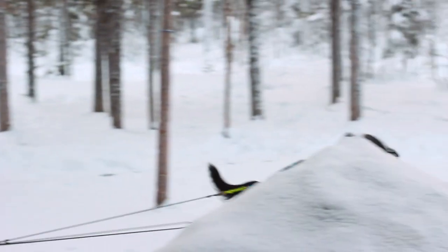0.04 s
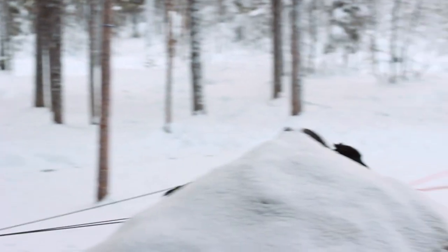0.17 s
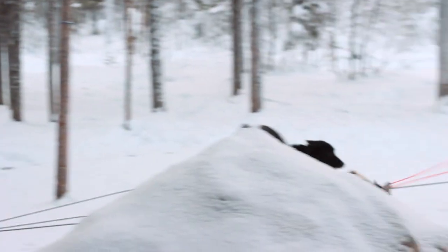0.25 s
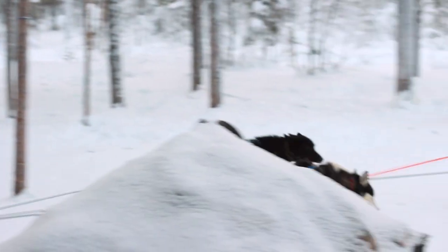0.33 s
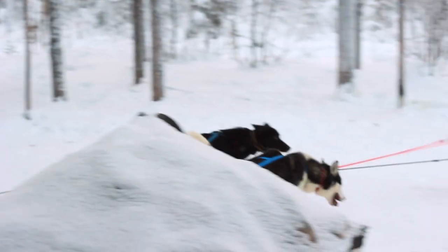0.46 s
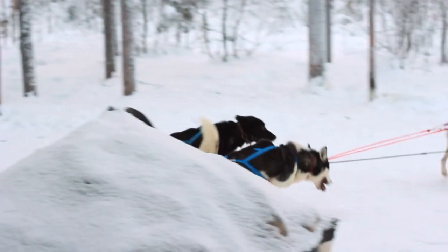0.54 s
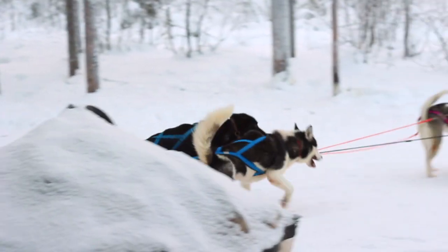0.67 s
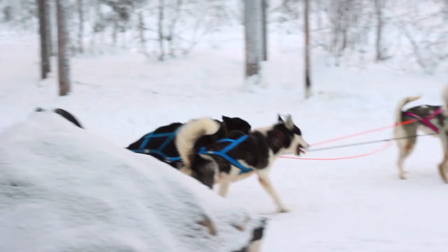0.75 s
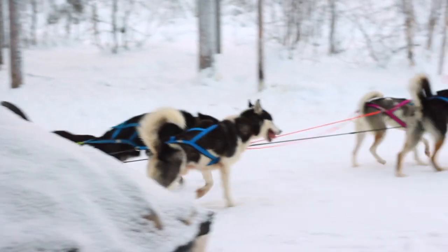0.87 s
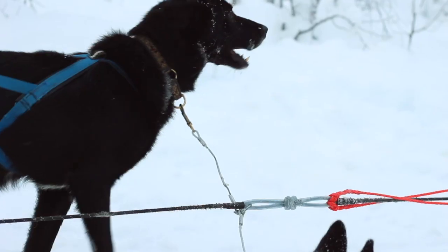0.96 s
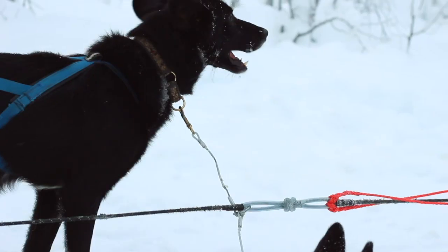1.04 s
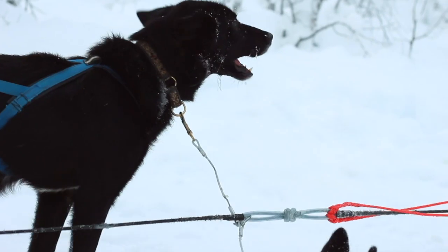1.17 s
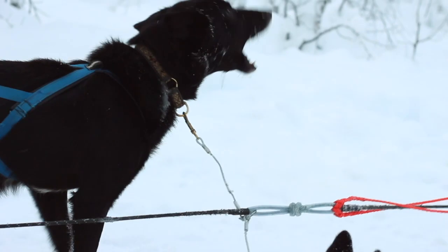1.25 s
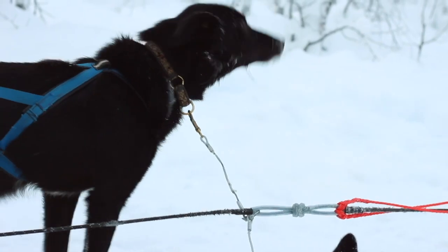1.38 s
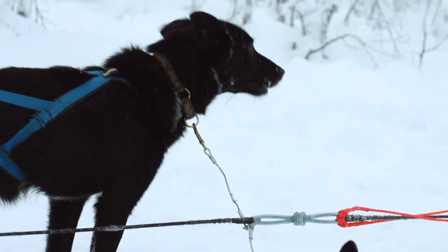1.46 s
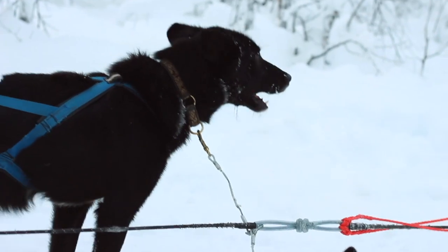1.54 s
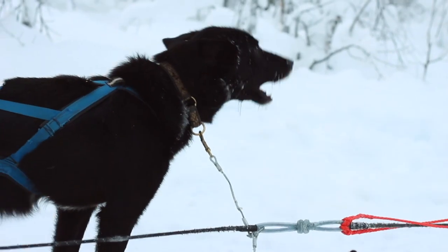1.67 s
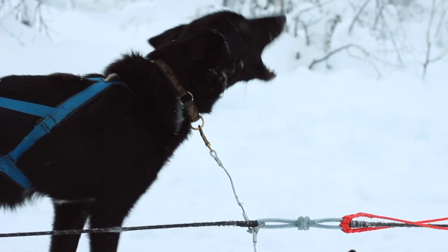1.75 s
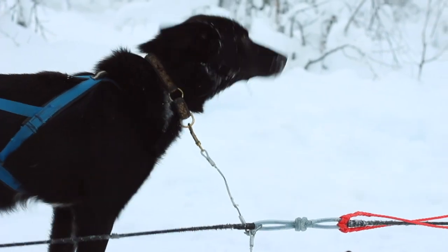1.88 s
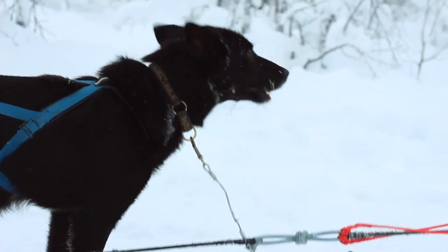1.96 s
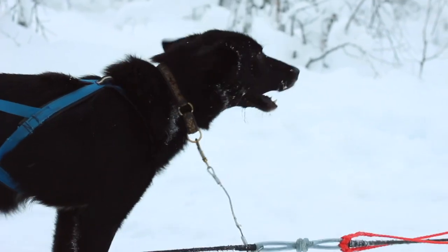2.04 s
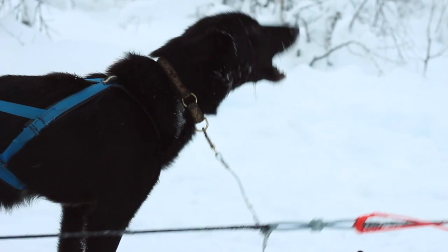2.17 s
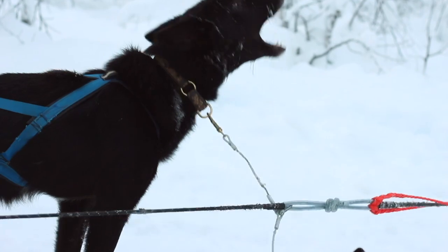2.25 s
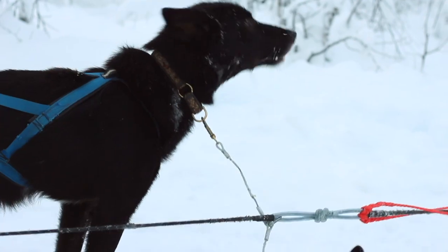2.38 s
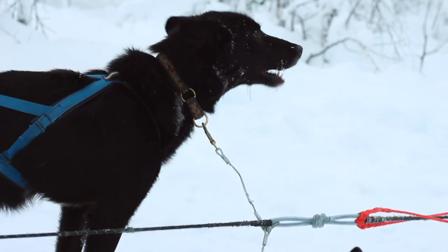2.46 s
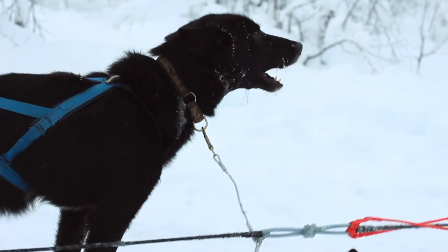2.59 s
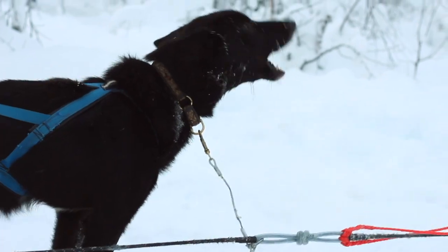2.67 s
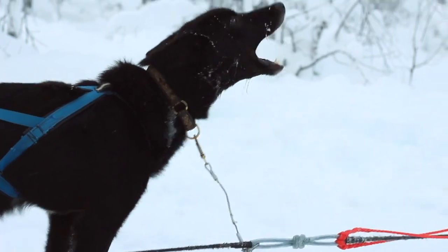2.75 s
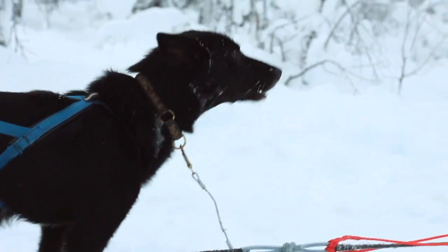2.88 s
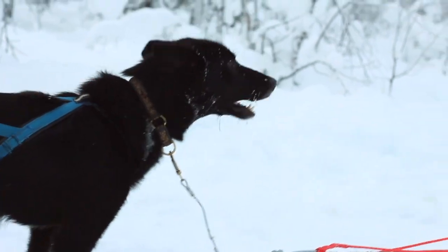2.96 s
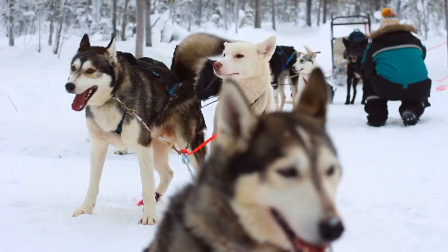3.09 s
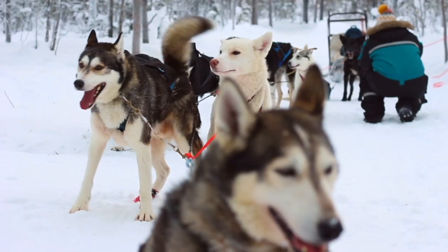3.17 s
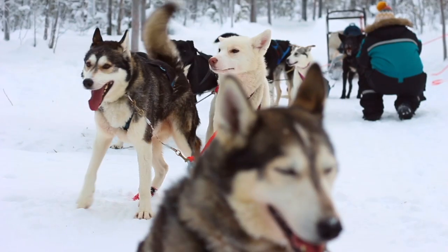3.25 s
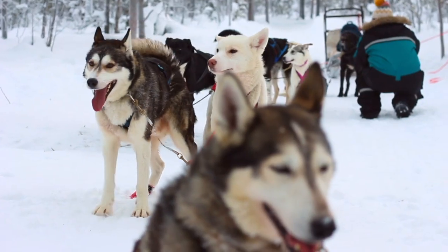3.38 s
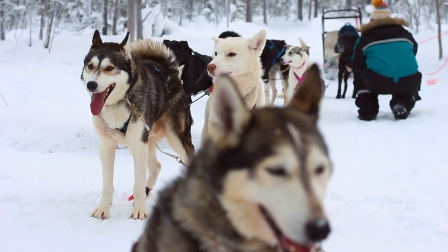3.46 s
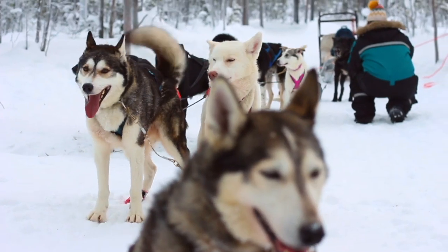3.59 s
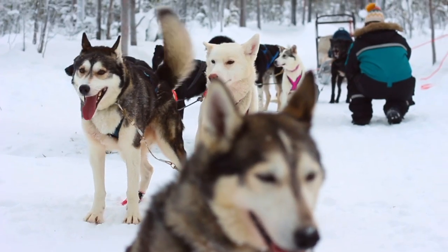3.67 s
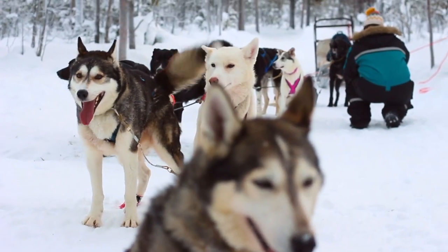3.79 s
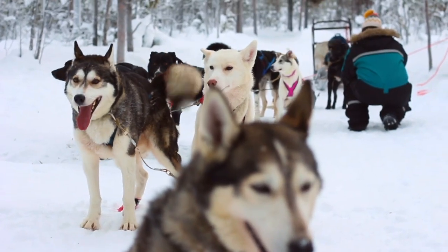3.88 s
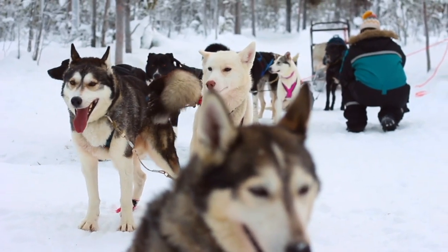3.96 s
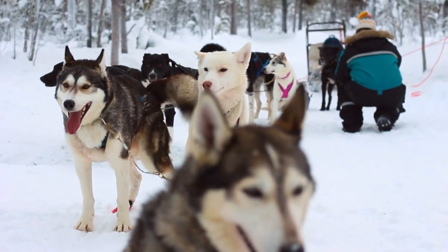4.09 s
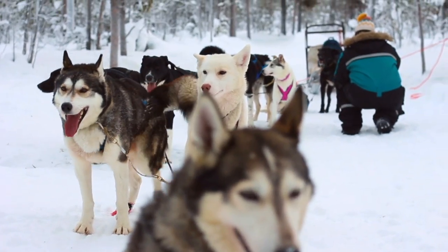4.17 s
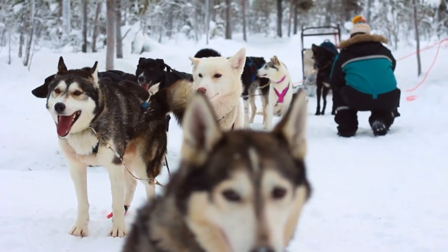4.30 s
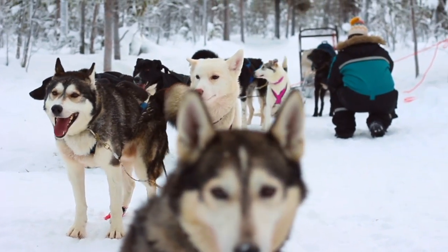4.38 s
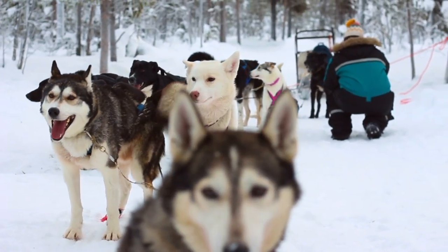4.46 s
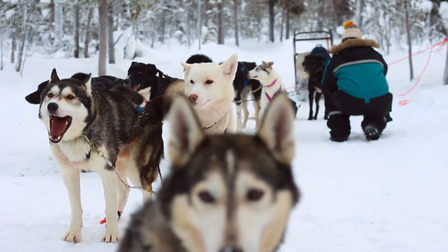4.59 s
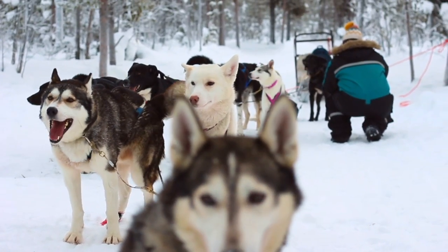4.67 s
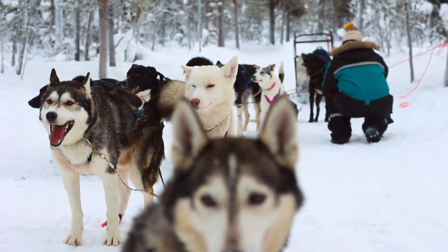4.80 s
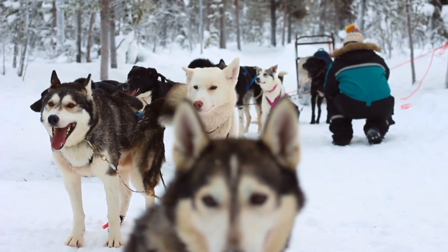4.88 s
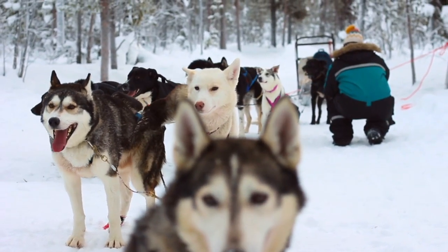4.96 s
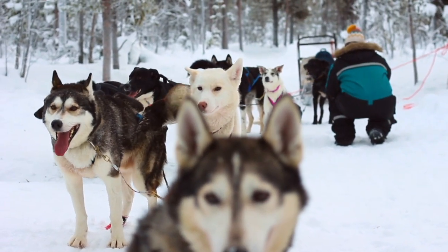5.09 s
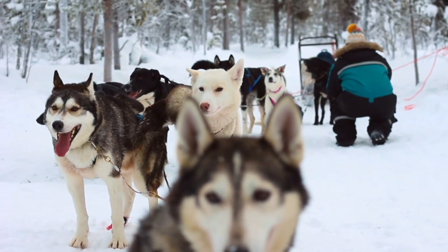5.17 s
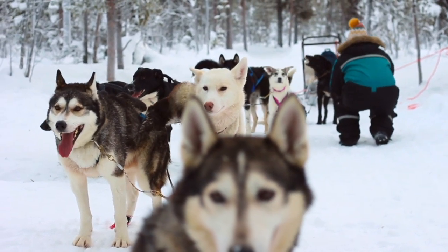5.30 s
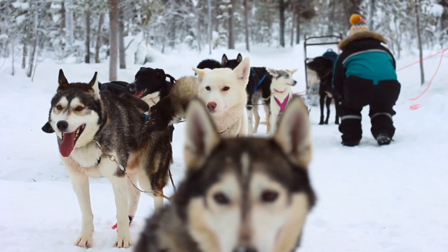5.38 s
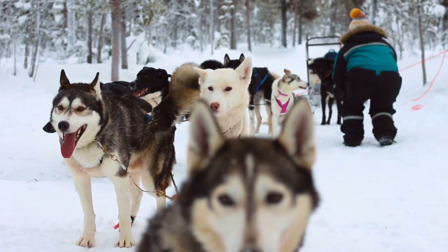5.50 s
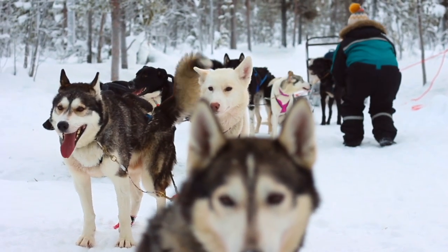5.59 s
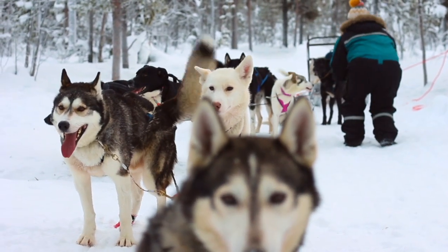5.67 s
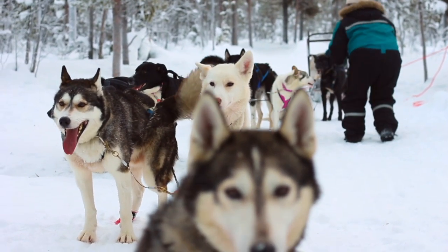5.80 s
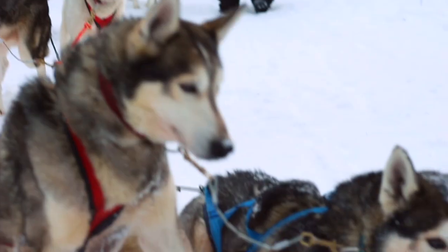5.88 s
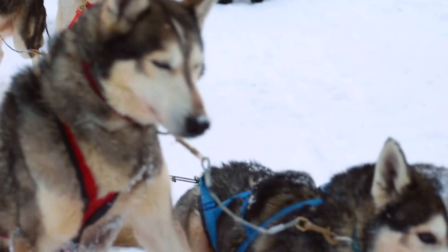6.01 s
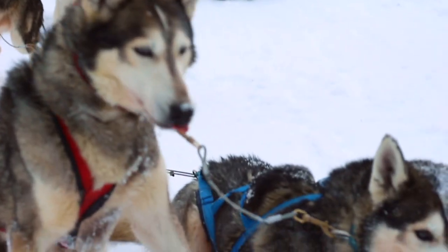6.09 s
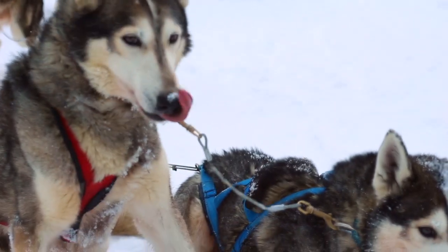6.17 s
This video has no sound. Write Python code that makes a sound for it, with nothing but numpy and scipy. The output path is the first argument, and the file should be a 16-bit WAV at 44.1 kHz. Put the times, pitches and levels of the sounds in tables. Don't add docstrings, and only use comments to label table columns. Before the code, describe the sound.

Sharp, short dog barks in four abruptly cut perspectives: quiet distant barks and cries with forest echo, then four dry, forceful barks close enough to overload the microphone, then five moderate hoarse barks spaced evenly a few metres away, slightly left, with panting, far yelps and thin nasal squeaks between them. One clear bark ends it. The open snowy forest returns a dull, short echo.

```python
import sys
import numpy as np
from scipy import signal
from scipy.fft import rfft, irfft
from scipy.io import wavfile
from scipy.ndimage import uniform_filter1d

SR = 44100
rng = np.random.default_rng(int(sys.argv[2]) if len(sys.argv) > 2 else 0)


def master_out(mix):
    frames = np.transpose(np.atleast_2d(mix))
    ceiling = np.clip(frames, -1, 1)
    pcm = np.round(ceiling * 32767).astype(np.int16)
    wavfile.write(sys.argv[1], SR, pcm)


def volts(x):
    e = np.asarray(x, float) / 20
    return 10 ** e


N = 275184

# (start [s], creak length [s], voiced length [s], first partial level [dB], pitch [Hz])
FAR = [
    (0, 0.021, 0.086, -40, 603),
    (.108, .025, .11, -35, 642.3),
    (.6, 0.029, 0.094, -36, 748),
    (.915, 0.019, 0.045, -34.5, 582.6),
    (.975, 0.02, 0.052, -42, 726),
]
NEAR = [
    (1.2826, .048, 0.092, -6.5, 602.3),
    (1.7677, 0.056, .078, -7, 590.6),
    (2.2075, .066, .095, -8, 612.8),
    (2.686, 0.075, .1, -6.5, 610),
]
TEAM = [
    (3.345, .04, .1, -22.5, 585.7),
    (3.861, 0.027, 0.1, -23.5, 578.4),
    (4.335, 0.0089, 0.11, -23, 587.2),
    (4.79, 0.027, 0.1, -23.5, 569.5),
    (5.258, .04, .097, -24, 581.3),
]
GROWL = [(4.2366, 0.1, 0.0033, -39, 603)]
YIP = [(4.597, .045, .04, -29.5, 507.8)]
LAST = [(6.057, 0.084, .057, -21.5, 591)]
CRIES = [
    (.02, 0.0056, 0.028, -54.5, 630),
    (.055, 0.0067, 0.064, -53, 540),
    (.125, 0.017, 0.017, -50, 665),
    (.155, .012, 0.043, -46, 515),
    (.612, 0.016, 0.09, -56, 650),
    (.65, 0.0065, 0.052, -51, 545),
    (.995, 0.0069, 0.049, -59, 580),
]

FAR_VOICE = dict(creak_hz=140, rough=.5, mouth=1.02, pan_db=-1)
NEAR_VOICE = dict(creak_hz=118, rough=.18, mouth=1.0, pan_db=-.6)
TEAM_VOICE = dict(creak_hz=115, rough=.42, mouth=1.0, pan_db=-3.8)
GROWL_VOICE = dict(creak_hz=90, rough=.9, mouth=.97, pan_db=-2.8)
YIP_VOICE = dict(creak_hz=110, rough=.03, mouth=1.0, pan_db=-3.3)
LAST_VOICE = dict(creak_hz=120, rough=.03, mouth=1.0, pan_db=-4)
CRY_VOICE = dict(creak_hz=140, rough=.12, mouth=1.02, pan_db=-1)

FAR_EFFORT = dict(start_db=-6.5, attack_s=0.024, creak_db=-1.5, swell_s=.04, sag_db=-3, release_s=0.064, scoop=.03, droop=0.06)
NEAR_EFFORT = dict(start_db=-22, attack_s=.016, creak_db=-6.5, swell_s=.028, sag_db=-0.63, release_s=0.033, scoop=.07, droop=.08)
TEAM_EFFORT = dict(start_db=-13.5, attack_s=0.038, creak_db=-3, swell_s=.045, sag_db=-2.5, release_s=0.023, scoop=0.05, droop=.06)
GROWL_EFFORT = dict(start_db=-36, attack_s=0.016, creak_db=-1, swell_s=0.0097, sag_db=-6, release_s=.015, scoop=0.01, droop=.03)
YIP_EFFORT = dict(start_db=-20, attack_s=.02, creak_db=-10, swell_s=.021, sag_db=-5, release_s=.035, scoop=.07, droop=.055)
LAST_EFFORT = dict(start_db=-28, attack_s=0.076, creak_db=-5.5, swell_s=.032, sag_db=-3, release_s=0.019, scoop=0.028, droop=0.034)
CRY_EFFORT = dict(start_db=-18, attack_s=0.0073, creak_db=-4.5, swell_s=0.018, sag_db=-1.5, release_s=.022, scoop=0.022, droop=.05)

FAR_MIX = dict(upper_db=-10.5, rasp_db=5, rasp_slope=0.91, break_db=-3.5, breath_db=-21.5, breath_slope=1)
NEAR_MIX = dict(upper_db=-17, rasp_db=-9, rasp_slope=0.86, break_db=6.5, breath_db=-7.5, breath_slope=2.32)
TEAM_MIX = dict(upper_db=-6, rasp_db=1.5, rasp_slope=0.99, break_db=0, breath_db=-20, breath_slope=1)
GROWL_MIX = dict(upper_db=-5.5, rasp_db=18.5, rasp_slope=1.05, break_db=0.5, breath_db=-14, breath_slope=0.57)
YIP_MIX = dict(upper_db=22, rasp_db=8, rasp_slope=0.48, break_db=-9, breath_db=12, breath_slope=1.4)
LAST_MIX = dict(upper_db=-0.5, rasp_db=-19.5, rasp_slope=0.085, break_db=11.5, breath_db=-51, breath_slope=0.1)
CRY_MIX = dict(upper_db=15.5, rasp_db=4.5, rasp_slope=1, break_db=-3.5, breath_db=-10, breath_slope=0.99)

# (center [Hz], width [Hz], level [dB])
FAR_THROAT = [(330, 240, -13.5), (928, 230, 5.5), (1350, 670, 1.5), (2300, 290, 1), (2900, 1700, -4.5)]
NEAR_THROAT = [(441.5, 200, 1.5), (809, 500, 9.5), (1630, 340, -6), (1930, 174, 0), (2660, 690, -22)]
TEAM_THROAT = [(415, 240, -19.5), (950, 510, 4.5), (1517, 202, 2.5), (1876, 200, -0.5), (2220, 290, -6)]

HOARSE_DB = [0.5, 0, -15.5, -35.5]
NEAR_DB = [0.5, 5.5, -7.5, -8.5]
YIP_DB = [0, -17, -22, -20]
LAST_DB = [-1, -2.5, -16, -30]
CRY_DB = [2.2, -14.5, -12, -19.5]

# (frequency [Hz], level per hertz [dB])
NEAR_BREATH = [(1290, -28.5), (2200, 6.5), (2590, -4.5), (2980, -3.5), (3450, -4.5), (4030, -7.5),
               (15600, -39)]
TEAM_BREATH = [(1800, -30), (2800, 3), (3500, -14), (4350, -2), (4850, -17), (5500, -1), (6400, -14),
               (15600, -38)]

# (start [s], length [s], pitch [Hz], glide [Hz], level [dB])
WHISTLES = [
    (0.77, 0.016, 9770, -1300, -38.5),
    (1.333, .052, 700, 165, -10),
    (2.044, 0.15, 3860, 28.5, -70),
    (2.441, 0.051, 4250, -400, -66),
    (2.875, .09, 6240, 58, -60.5),
    (3.031, 0.071, 5100, 81, -57.5),
    (4.326, 0.028, 6660, 84.5, -45.5),
    (4.689, 0.039, 6080, 198.5, -31.5),
    (4.719, 0.0693, 1042, 293.5, -38),
    (5.943, 0.078, 4430, -260, -53),
]

# (middle [s], length [s], far yelps and late bark echo level [dB],
# panting level [dB])
PACK = [(0.27, 0.1, -80, -57), (.85, 0.48, -57.5, -67), (1.083, 0.15, -66.5, -61.5),
        (1.202, .14, -64.5, -67.5), (1.6, 0.35, -56.5, -102.5), (2.076, 0.25, -52.5, -71),
        (2.55, 0.2, -69, -112), (3.101, 0.051, -60, -54.5), (3.229, 0.39, -113.5, -58.5),
        (3.259, 0.36, -56.5, -57.5), (3.62, 0.21, -57, -75.5), (3.775, 0.078, -55.5, -65),
        (4.075, 0.13, -62, -84), (4.501, 0.18, -49.5, -62), (4.705, 0.21, -51, -41),
        (5.164, 0.065, -83.5, -70), (5.592, 0.062, -81.5, -56.5), (5.778, 0.053, -85, -81.5),
        (5.862, 0.069, -68.5, -49), (5.877, 0.0083, -47.5, -51), (5.946, 0.061, -54.5, -54)]
# (center [Hz], width [Hz], level [dB])
YELP = [(580, 120, 2.65), (1090, 130, -1.5), (1650, 630, -4.5)]
PANT = [(1400, 1200, -1.5), (2170, 180, 0), (2950, 240, -3.5), (3450, 340, -4), (4130, 630, -7.5),
        (5500, 1500, -17.5)]
PAWS = [(238.6, 59, -2), (350, 51, 1.5)]
# (far yelps and late bark echo [dB], panting [dB], paws [dB])
HUSH = [
    (-56, -53, -64.5),
    (-62, -85.5, -81.5),
    (-69, -73, -79),
    (-57.5, -64, -78),
]

# (start [s], peak level [dB], pitch [Hz])
TICKS = [
    (.262, -36, 4200),
    (.392, -44.5, 3870),
    (.423, -41.5, 1120),
    (1.1, -40.5, 788),
    (1.116, -43.5, 766),
    (1.673, -56, 3030),
    (2.2, -55, 3100),
    (3.195, -56.5, 7000),
]

# (start [s], end [s], fade-out [s], right channel delay [samples])
SHOTS = [
    (0, .9545, 1e-5, 2),
    (.958, 3.046, .01, 1),
    (3.048, 5.877, .002, 0),
    (5.91, 6.24, 1e-5, 0),
]
ECHO_GAIN_DB = [-12, -24, -18, -22.5]

RELEASE_DB, CREAK_RISE_DB, UPPER_SLOPE = -36.5, 4.5, 1.2
BREAK_S, EXHALE_S, EXHALE_DB = 0.01305, 0.015, -10
THROAT_TOP_HZ, EARLY_TONE, PATCH_DB = 2800, .35, 4
WAVER_HZ, WAVER, TAPER_DB = 13, .018, -17
PAWS_DB, STIR_EDGE_DB, TICK_CYCLES = -32.5, -18, 15
ECHO_T60_S, ECHO_TOP_HZ, SNOW_T60_S, SNOW_DB, YIP_ECHO_DB = 0.63, 2200, 0.31, 15, -9
OVERLOAD = .86
POP_S, POP_WIDTH_S, POP_DB = .953, 0.00075, -38


def barks():
    close_air, distant_air = breath_noise(NEAR_BREATH), breath_noise(TEAM_BREATH)
    out, hiss = np.zeros((3, N)), rng.standard_normal(N)
    sway = wobble(100), wobble(59)
    dogs = [
        (CRIES, CRY_VOICE, CRY_EFFORT, CRY_MIX, FAR_THROAT, CRY_DB),
        (FAR, FAR_VOICE, FAR_EFFORT, FAR_MIX, FAR_THROAT, HOARSE_DB),
        (NEAR, NEAR_VOICE, NEAR_EFFORT, NEAR_MIX, NEAR_THROAT, NEAR_DB),
        (TEAM, TEAM_VOICE, TEAM_EFFORT, TEAM_MIX, TEAM_THROAT, HOARSE_DB),
        (GROWL, GROWL_VOICE, GROWL_EFFORT, GROWL_MIX, TEAM_THROAT, HOARSE_DB),
        (YIP, YIP_VOICE, YIP_EFFORT, YIP_MIX, TEAM_THROAT, YIP_DB),
        (LAST, LAST_VOICE, LAST_EFFORT, LAST_MIX, TEAM_THROAT, LAST_DB),
    ]
    for calls, *dog in dogs:
        air = close_air if calls is NEAR else distant_air
        for row in calls:
            span, sound = bark(row, *dog, air, hiss, sway)
            if calls is FAR:
                sound = lowpass(sound, 2, 6500)
            to_trees = sound.mean(0)
            if calls is YIP:
                to_trees = to_trees * volts(YIP_ECHO_DB)
            shot_end = min(end for _, end, *_ in SHOTS if end > row[0])
            out[:, span] += np.vstack([sound, to_trees]) * (span / SR < shot_end)
    return out


def bark(row, voice, shape, mix, throat, partial_db, air, hiss, sway):
    start, creak_s, voiced_s, level_db, pitch_hz = row
    rough = voice["rough"]
    end_s = creak_s + voiced_s
    span = np.arange(int(start * SR), min(int((start + end_s + .1) * SR), N))
    t = span / SR - start
    push_db, bend = effort(t, creak_s, voiced_s, **shape)
    hz, first_db = pitch_hz * bend, level_db + push_db
    upper_db = level_db + mix["upper_db"] + UPPER_SLOPE * push_db

    rasp_db = level_db + mix["rasp_db"] + mix["rasp_slope"] * push_db
    rasp_db = rasp_db + mix["break_db"] * np.exp(-((t - end_s) / BREAK_S) ** 2)
    rasp_db = rasp_db + 2 * RELEASE_DB * np.clip((t - end_s - .04) / .06, 0, 1)

    blow = volts(mix["breath_db"] + mix["breath_slope"] * first_db)
    keep = np.exp(-1 / (EXHALE_S * SR))
    blow = np.maximum(blow, volts(EXHALE_DB) * signal.lfilter([1 - keep], [1, -keep], blow))

    lock = np.clip((t - creak_s) / 0.02525 + .6, 0, 1)
    pulses = fold_pulses(voice["creak_hz"] + lock * (hz / 2 - voice["creak_hz"]), rough)
    puffs = unit(signal.lfilter([1], [1, -np.exp(-1 / (0.0041 * SR))], pulses))
    rough_air = (.3 + .7 * rough) * (.8 + .6 * puffs) * hiss[span]
    rasp = lowpass(unit(tract(pulses + rough_air, throat, voice["mouth"])), 4, THROAT_TOP_HZ)
    creak = unit(ring(ring(ring(pulses, pitch_hz, 79), pitch_hz, 500), pitch_hz, 900))

    phase = 2 * np.pi * np.cumsum(hz * (1 + .12 * rough * sway[0][span])) / SR
    swell = np.sqrt(2) * (1 + .5 * rough * sway[1][span])
    first = np.maximum(lock, EARLY_TONE) * swell * np.cos(phase) + (1 - lock) * creak
    upper = lock * swell * sum(volts(db) * np.cos((k + 2) * phase) for k, db in enumerate(partial_db))
    voiced = volts(first_db) * first + volts(upper_db) * upper + volts(rasp_db) * rasp

    gusts = volts(1.6 * sway[1][span]) * (0.36 + 0.81 * np.minimum(puffs, 2))
    breath = blow * (0.3 + 0.68 * lock) * gusts * air[:, span]
    return span, place((voiced + breath) * fade(t, .02), voice["pan_db"])


def fold_pulses(rate, rough):
    chance = rng.standard_normal((160, 2)).T
    gaps = np.clip(1 + (.08 + .2 * rough) * chance[0], .4, 2)
    gaps[:2] = .2, 1.25
    at = np.searchsorted(np.cumsum(rate) / SR, np.cumsum(gaps))
    inside = at < len(rate)
    pulses = np.zeros(len(rate))
    pulses[at[inside]] = volts(3 * chance[1][inside])
    return pulses * np.sqrt(SR / rate)


def effort(t, creak_s, voiced_s, start_db, attack_s, creak_db, swell_s, sag_db, release_s, scoop, droop):
    end_s = creak_s + voiced_s
    knots = np.maximum.accumulate([0, min(attack_s, creak_s), creak_s, creak_s + min(swell_s, voiced_s),
                                   end_s, end_s + release_s, end_s + 2 * release_s])
    levels = [start_db, creak_db - CREAK_RISE_DB, creak_db, 0, sag_db, RELEASE_DB, 2 * RELEASE_DB]
    full_s = knots[3]
    before = np.clip((full_s + swell_s - t) / (2 * swell_s), 0, 1)
    hold = np.clip((t - full_s) / (end_s - full_s + 0.00037), 0, 1.5)
    return np.interp(t, knots, levels), 1 - scoop * before ** 2 - droop * hold ** 3


def breath_noise(spectrum):
    f = np.fft.rfftfreq(N, 1 / SR)
    hz, db = np.array(spectrum).T
    gain = volts(np.interp(np.log(f + 1), np.log(hz), db, left=-60))
    mid, side = rfft(rng.standard_normal((2, N))) * gain
    side = side * np.clip(f / 8000, .3, .9)
    return place(unit(patchy(irfft(np.array([mid + side, mid - side]), N))), -1.5)


def patchy(x):
    z = signal.stft(x, nperseg=256)[2]
    spots = uniform_filter1d(rng.standard_normal(z.shape[1:]), size=3, axis=0)
    spots = uniform_filter1d(spots, size=9, axis=1)
    return signal.istft(z * volts(PATCH_DB * unit(spots)), nperseg=256)[1][:, :N]


def whistles():
    out, drift, flutter = np.zeros(N), wobble(200), wobble(130)
    for start, length, start_hz, glide_hz, level_db in WHISTLES:
        span = np.arange(int(start * SR), int((start + length) * SR))
        t = span / SR - start
        hz = (start_hz + glide_hz * t / length) * (1 - WAVER * np.cos(2 * np.pi * WAVER_HZ * t))
        db = level_db + TAPER_DB * (2 * t / length - 1) ** 4
        phase = 2 * np.pi * np.cumsum(hz * (1 + .013 * drift[span])) / SR
        tone = np.sin(phase) + volts(-26.0) * np.sin(2 * phase)
        level = np.sqrt(2) * volts(db + 3.8 * flutter[span])
        out[span] += level * tone * np.clip(t / 0.002, 0, 1) * fade(t, 0.014)
    return place(out[None], -3.6)


def ticks():
    out = np.zeros(N)
    t = np.arange(SR // 30) / SR
    for start, db, hz in TICKS:
        noise = ring(ring(rng.standard_normal(len(t)), hz, hz / 3), hz, hz / 3)
        shape = np.exp(-t * hz / TICK_CYCLES) * np.minimum(t * hz / 2, 1)
        out[int(start * SR):][:len(t)] += volts(db) * unit(noise) * shape
    return place(out[None], -1.5)


def pack():
    t = np.arange(0, N / SR, .002)
    middle, length, yelp_db, pant_db = np.transpose(PACK)[:, :, None]
    stir_db = np.maximum(STIR_EDGE_DB * (2 * (t - middle) / length) ** 4, -90)
    shot_number = np.searchsorted([shot[0] for shot in SHOTS], t, side="right") - 1
    hush = np.array(HUSH)[shot_number].T
    out, shared, own = 0, wobble(20), wobble(25)
    layers = [(YELP, yelp_db, hush[0], .35), (PANT, pant_db, hush[1], .6), (PAWS, pant_db + PAWS_DB, hush[2], .3)]
    for modes, db, hush_db, width in layers:
        noise = rng.standard_normal((2, N))
        mid, side = sum(tract(noise, [mode]) * volts(2 * np.roll(own, rng.integers(N))) for mode in modes)
        both = unit(np.array([mid + width * side, mid - width * side]))
        level = volts(hush_db) + volts((db + stir_db).max(0))
        out = out + both * np.interp(np.arange(N) / SR, t, level) * volts(shared)
    return place(lowpass(out, 4, 8500), -2.5)


def forest():
    t = np.arange(SR) / SR
    clumps = volts(3.0 * np.repeat(rng.standard_normal(SR // 441), 441))
    mid, side = rng.standard_normal((2, SR)) * clumps
    noise = place(np.array([mid + .9 * side, mid - .9 * side]), -2) * np.clip(t / .01, 0, 1)
    trunks = lowpass(noise, 3, ECHO_TOP_HZ) * volts(-60 * t / ECHO_T60_S)
    snow = lowpass(noise, 1, 7000) * volts(SNOW_DB - 60 * t / SNOW_T60_S)
    return unit(highpass(trunks + snow, 3, 380)) / np.sqrt(SR)


def unit(x):
    return x / np.sqrt(np.mean(x ** 2) + 1e-20)


def lowpass(x, order, hz):
    return signal.sosfilt(signal.butter(order, hz, fs=SR, output="sos"), x)


def highpass(x, order, hz):
    return signal.sosfilt(signal.butter(order, hz, "highpass", fs=SR, output="sos"), x)


def ring(x, hz, width):
    return signal.lfilter(*signal.iirpeak(hz, hz / width, SR), x)


def tract(x, modes, scale=1):
    out = 0
    for k, (hz, width, db) in enumerate(modes):
        rung = ring(ring(x, hz * scale, 1.57 * width), hz * scale, 1.57 * width)
        out = out + (-1) ** k * volts(db) * rung
    return out


def fade(t, out_s):
    return np.clip(t / 0.009, 0, 1) * np.clip((t[-1] - t) / out_s, 0, 1)


def place(x, pan_db):
    return x * volts(np.array([[pan_db], [-pan_db]]) / 2)


def wobble(rate_hz):
    return unit(lowpass(rng.standard_normal(N), 2, rate_hz))


def scene():
    voices, bed, trees = barks(), pack() + whistles() + ticks(), forest()
    out = np.zeros((2, N))
    for (start, end, out_s, lag), gain_db in zip(SHOTS, ECHO_GAIN_DB):
        a, b = int(start * SR), min(int(end * SR), N)
        echo = signal.fftconvolve(voices[2:, a:b], trees, axes=1)[:, :b - a]
        bounce = ring(ring(np.roll(voices[0, a:b], SR // 300), 200, 250), 200, 250)
        bank = volts(-2.0) * bounce * np.array([[1], [-1]])
        shot = voices[:2, a:b] + bank + bed[:, a:b] + volts(gain_db) * echo
        shot = highpass(shot, 4, 135)
        shot = OVERLOAD * np.tanh(shot / OVERLOAD)
        shot = highpass(shot, 1, 60)
        shot[1] = np.roll(shot[1], lag)
        i = np.arange(b - a)
        fade_in = np.clip(i / (0.0056 * SR * (a > 0) + 1), 0, 1)
        out[:, a:b] = shot * fade_in * fade(i / SR, out_s)
    thump = np.exp(-((np.arange(N) / SR - POP_S) / POP_WIDTH_S) ** 2)
    return out + volts(POP_DB) * thump


def top_cut(x):
    return signal.sosfilt(signal.butter(12, 15750, fs=SR, output="sos"), x)


def record(dry):
    return top_cut(dry)


dry = scene()
out = record(dry)
master_out(out)
```